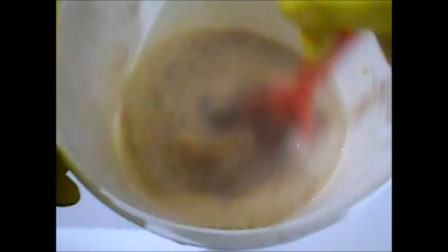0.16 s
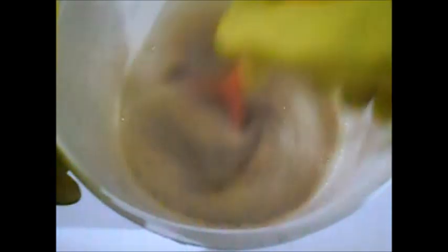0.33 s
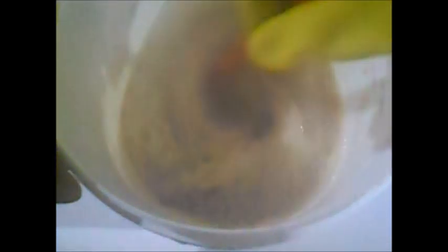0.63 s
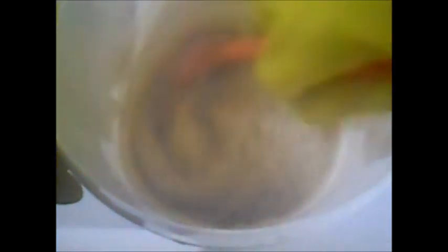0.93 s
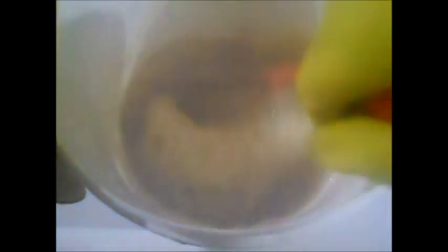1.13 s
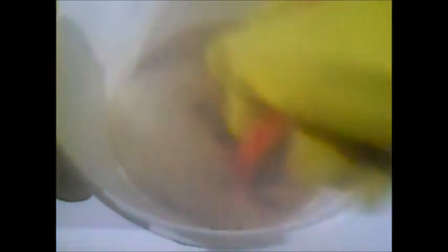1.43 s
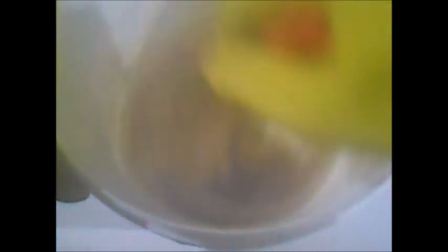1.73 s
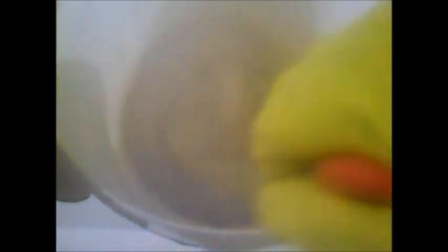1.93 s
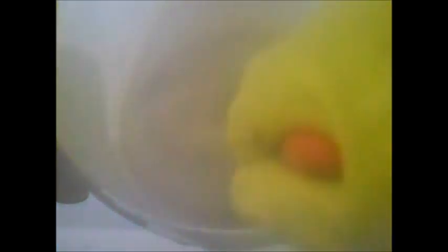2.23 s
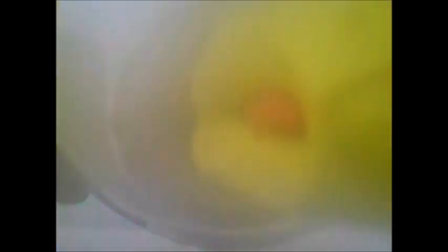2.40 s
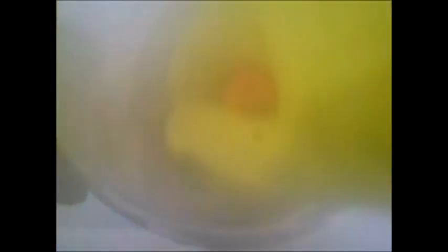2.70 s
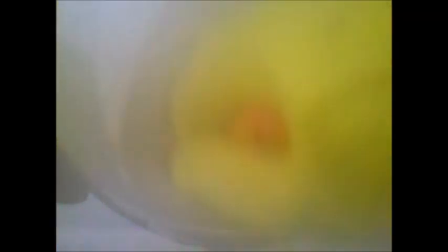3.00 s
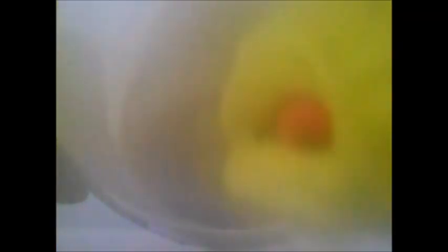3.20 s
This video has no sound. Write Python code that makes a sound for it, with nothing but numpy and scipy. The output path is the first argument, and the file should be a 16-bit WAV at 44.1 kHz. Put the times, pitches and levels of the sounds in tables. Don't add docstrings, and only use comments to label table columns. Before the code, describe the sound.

Wet gritty stirring in a plastic tub, separate strokes at first, then nearly continuous stronger scraping with squeaks and soft sloshes; the tip knocks the wall now and then. Close mono pickup indoors, low rumble and hiss.

```python
import sys
import numpy as np
from scipy import signal
from scipy.fft import rfft, irfft
from scipy.io import wavfile
from scipy.ndimage import uniform_filter1d

SR = 44100
rng = np.random.default_rng(int(sys.argv[2]) if len(sys.argv) > 2 else 0)


def gain_from_decibels(decibels):
    exponent = np.asarray(decibels, float) / 20
    return 10 ** exponent


def bounce(signal):
    frames = np.transpose(np.atleast_2d(signal))
    limited = np.clip(frames, -1, 1)
    pcm = np.round(limited * 32767).astype(np.int16)
    wavfile.write(sys.argv[1], SR, pcm)


N = 147735


def evened(x):
    return x / np.sqrt(np.mean(x ** 2) + 1e-20)


def coloured(x, points):
    f, db = np.transpose(points)
    bins_hz = np.fft.rfftfreq(8192, 1 / SR)
    curve_db = np.interp(np.log(bins_hz + 1), np.log(f), db, -60, -60)
    log_gain = curve_db * np.log(10) / 20
    whole = np.r_[log_gain, log_gain[-2:0:-1]]
    taps = np.fft.ifft(np.exp(np.conj(signal.hilbert(whole)))).real
    return evened(signal.oaconvolve(x, taps[:8000])[:N])


def slow(per_s):
    size = max(int(SR / per_s), 2)
    z = uniform_filter1d(rng.standard_normal(N), size)
    return evened(uniform_filter1d(z, size))


def resonate(x, hz, width):
    turn = np.exp(2j * np.pi * np.cumsum(hz * np.ones(len(x))) / SR)
    r = np.exp(-np.pi * width / SR)
    return 2 * (turn * signal.lfilter([1 - r], [1, -r], x / turn)).real


def patchy(x, db):
    z = signal.stft(x, nperseg=512)[2]
    field = uniform_filter1d(rng.standard_normal(z.shape), size=6, axis=0)
    field = uniform_filter1d(field, size=7, axis=1)
    return signal.istft(z * gain_from_decibels(db * evened(field)), nperseg=512)[1][:N]


def add(mix, s, sound):
    part = mix[round(s * SR):][:len(sound)]
    part += sound[:len(part)]


def room_hiss():
    # frequency in Hz, level in dB per Hz.
    spectrum = [(88, -8), (150, -5), (248, -9), (319, -9.5), (2140, -23), (2960, -25), (3420, -26.5),
                (6770, -29), (11000, -34), (14300, -71), (22000, -120)]
    return gain_from_decibels(-55) * patchy(coloured(rng.standard_normal(N), spectrum), 2.4)


def room_rumble():
    # frequency in Hz, level in dB per Hz.
    spectrum = [(5.9, -42.5), (10, 4), (32, -1.5), (64, -9), (86, -15), (250, -31), (320, -31), (550, -120)]
    level_db = -40.5 + 0.23 * np.tanh(slow(9.3))
    return gain_from_decibels(level_db) * coloured(rng.standard_normal(N), spectrum)


def slosh(length, db, top_hz):
    low_hz, rise = 402, 0.21
    u = np.arange(0, 1, 1 / (length * SR))
    band = signal.butter(3, (low_hz, top_hz), "band", fs=SR, output="sos")
    dull = signal.sosfilt(band, rng.standard_normal(len(u)))
    return gain_from_decibels(db) * evened(dull) * np.minimum(u / rise, 1) * (1 - u ** 2)


def add_sloshes(mix):
    # start in seconds, length in seconds, level in dB, top in Hz.
    sloshes = [(0.562, 0.083, -50, 2000), (1.155, 0.046, -56, 2580), (1.788, 0.048, -45.5, 1400),
               (2.035, .075, -50, 2700), (2.116, 0.043, -44.5, 1500), (3.065, 0.1, -42, 2000),
               (3.274, 0.09, -42.5, 960)]
    for s, *rest in sloshes:
        add(mix, s, slosh(*rest))


SQUEAK_STRETCH = 1.4


def squeak(length, db, hz):
    rough_width_hz, roughness = 97, 0.56
    u = np.arange(0, 1, 1 / (SQUEAK_STRETCH * length * SR))
    tone = np.sin(2 * np.pi * hz * np.arange(len(u)) / SR)
    rough = evened(resonate(rng.standard_normal(len(u)), hz, rough_width_hz))
    return gain_from_decibels(db - 3) * np.sin(np.pi * u) * (tone + roughness * rough)


def add_squeaks(mix):
    # middle in seconds, length in seconds,
    # level in dB, pitch in Hz.
    squeaks = [(0.447, 0.043, -46, 1695), (0.514, 0.021, -45, 3100), (0.551, 0.031, -43, 1711),
               (0.775, 0.0079, -58, 6060), (0.775, 0.036, -68, 2630), (1.43, 0.016, -45.5, 3450),
               (1.436, 0.024, -40, 1243), (1.444, 0.062, -54, 1320), (1.867, 0.017, -39, 1310),
               (2.227, 0.069, -52, 2070), (2.233, 0.025, -48, 1210), (2.236, 0.02, -44, 4960),
               (2.236, 0.026, -45, 3620), (2.241, 0.02, -46, 6890), (2.25, 0.05, -47, 4750),
               (2.273, 0.031, -39.5, 3772), (2.521, 0.026, -41, 1244), (2.548, 0.035, -42, 3330),
               (2.744, 0.054, -53, 4570), (2.805, 0.032, -43, 1319), (2.878, 0.059, -44, 1440),
               (2.88, 0.064, -38.5, 1320), (2.888, 0.02, -46, 4210), (2.889, 0.023, -41, 3620),
               (2.938, 0.03, -41.5, 1912), (3.042, 0.024, -51, 2520), (3.085, 0.026, -43, 1540),
               (3.178, 0.025, -49, 6600), (3.178, 0.022, -33.5, 1300), (3.179, 0.033, -55, 3630),
               (3.18, 0.017, -46, 1650), (3.185, 0.046, -45.5, 2285), (3.192, 0.024, -43, 9020),
               (3.208, 0.063, -38, 1420), (3.211, 0.035, -48, 6780), (3.211, 0.057, -49, 5000),
               (3.233, 0.018, -44, 8300)]
    # middle in seconds, length in seconds, level in dB, pitch in Hz.
    more_squeaks = [(2.585, .01, -35, 2900), (1.846, 0.0089, -43.5, 3750), (1.858, 0.012, -40, 3800),
                    (.435, .03, -43, 1300), (.512, .015, -37, 930)]
    # middle in seconds, length in seconds, level in dB, pitches of its partials
    # in Hz.
    thin_tones = (.776, .018, -57, (1000, 1300, 1720, 2590, 3950, 4370, 4930, 5310, 6030))
    s, length, db, partials = thin_tones
    notes = squeaks + more_squeaks + [(s, length, db, hz) for hz in partials]
    for s, length, *rest in notes:
        add(mix, s - SQUEAK_STRETCH * length / 2, squeak(length, *rest))


def snap(db, low_hz):
    snap_s = 0.00045
    u = np.arange(300) / SR / snap_s
    burst = rng.standard_normal(300) * u * np.exp(1 - u)
    burst = signal.lfilter(*signal.butter(2, low_hz, "high", fs=SR), burst)
    return gain_from_decibels(db) * burst / abs(burst).max()


def add_snaps(mix):
    # start in seconds, peak in dB, frequency in Hz below which it is thin.
    snaps = [(0.0224, -28, 1470), (.072, -32, 5000), (.0785, -41, 7500), (.0929, -16.5, 5000),
             (0.2307, -31, 4000), (0.2348, -24, 5000), (.242, -32, 5000), (.4027, -45, 7000),
             (0.858, -34, 4500), (1.166, -39, 8500), (1.346, -33, 5500), (1.357, -37, 5500),
             (1.6667, -33.5, 4430), (1.795, -41, 5000), (2.035, -32, 7000), (2.672, -34.5, 4500),
             (1.217, -40.5, 2500), (2.995, -33, 7000), (2.996, -35, 7000), (3.327, -45, 8000)]
    for s, *rest in snaps:
        add(mix, s, snap(*rest))


def pop(db, hz):
    cycles, glide, crack_db, crack_s = 0.85, 0.04, -12, 0.0012
    t = np.arange(600) / SR
    u = t * hz / cycles
    tone = np.sin(2 * np.pi * hz * t * (1 + glide * u / 4)) * u * np.exp(1 - u)
    crack = rng.standard_normal(600) * np.exp(-t / crack_s)
    return gain_from_decibels(db) * (tone + gain_from_decibels(crack_db) * crack)


def add_pops(mix):
    # start in seconds, peak in dB, pitch in Hz.
    pops = [(.05, -46, 2600), (.058, -43, 2000), (0.338, -42.5, 920), (0.362, -38.5, 960),
            (0.39, -32, 1340), (0.419, -31, 1410), (0.728, -38, 1580), (0.818, -44.5, 1570),
            (0.859, -41.5, 2720), (0.875, -40.5, 1646), (.92, -40.5, 1210), (1.028, -42.5, 1660),
            (1.128, -39, 1300), (1.165, -41.5, 1760), (1.1676, -42, 3450), (1.218, -40.5, 1210),
            (1.345, -38, 1800), (1.43, -31.5, 3620), (1.614, -41, 1080), (1.677, -44, 3670),
            (1.688, -50, 3530), (1.731, -45.5, 3290), (1.989, -46, 2300), (2.118, -38, 1080),
            (2.131, -40, 5300), (2.412, -33.5, 1500), (2.542, -40, 1720), (2.851, -36, 1390),
            (2.0334, -28, 2460), (0.093, -35, 1500)]
    for s, *rest in pops:
        add(mix, s, pop(*rest))


def knock(db, tick_hz, boom_db, boom_hz):
    # frequency as a ratio to the tick, and their levels in dB.
    mate_ratios = (0.753, 1.26, 2.24)
    mate_levels = (-6, -8.5, -20.5)
    tick_s, tick_rise_s, boom_rise_s, boom_cycles = 0.0015, 0.00052, 0.00077, 25.3
    t = np.arange(5000) / SR
    tick = np.sin(2 * np.pi * tick_hz * t)
    for ratio, mate_db in zip(mate_ratios, mate_levels):
        tick = tick + gain_from_decibels(mate_db) * np.sin(2 * np.pi * tick_hz * ratio * t)
    tick = tick * np.minimum(t / tick_rise_s, 1) * np.exp(-(t / tick_s) ** 2)
    boom = np.sin(2 * np.pi * boom_hz * t) * (1 - np.exp(-t / boom_rise_s))
    boom *= gain_from_decibels(boom_db - 60 * t * boom_hz / boom_cycles)
    return gain_from_decibels(db) * (tick - boom)


def add_knocks(mix):
    # start in seconds, peak in dB, tick in Hz, boom in dB, boom in Hz.
    knocks = [(.685, -24, 1113, -10.5, 403), (1.3544, -34, 724, -17, 495), (1.3596, -21, 2370, -7.5, 430),
              (1.8003, -37, 3620, 2, 1175), (1.803, -33.5, 1150, 3.5, 710), (1.806, -38.5, 657, 10.5, 396),
              (2.003, -32.5, 1900, -7, 388), (2.034, -18, 1820, -11, 449), (2.2304, -26.5, 1750, -6, 412),
              (2.5958, -19.5, 1480, -1.5, 980), (3.042, -22, 1390, -5.5, 715), (3.192, -31, 900, 4, 643)]
    for s, *rest in knocks:
        add(mix, s, knock(*rest))


def add_thump(mix):
    # start in seconds, length in seconds, level in dB.
    thump = (1.801, .029, -26)
    s, length, db = thump
    u = np.arange(0, 1, 1 / (length * SR))
    add(mix, s, gain_from_decibels(db) * np.sin(2 * np.pi * u) * np.sin(np.pi * u))


def pressure():
    # start, rise, hold and fall in seconds, pressure in dB.
    strokes = [(0.068, 0.0095, 0.12, .1, -44.5), (0.38, 0.043, 0.12, 0.16, -40.5),
               (0.629, 0.029, 0.058, 0.13, -49), (1.353, 0.013, 0.16, 0.19, -44),
               (1.828, 0.013, 0.03, 0.029, -42), (2.028, 0.0024, 0.015, 0.046, -50.5),
               (2.059, 0.16, 0.06, 0.1, -39.5), (2.396, 0.013, 0.069, 0.045, -49.5),
               (2.431, 0.12, 0.055, 0.14, -41), (2.682, 0.04, 0.099, 0.034, -46.5),
               (2.804, 0.049, 0.069, 0.073, -38.5), (2.937, 0.1, 0.02, 0.068, -36),
               (3.094, 0.078, 0.071, 0.073, -36.5), (3.24, 0.022, 0.092, 0.055, -44.5)]
    swing_db = 20
    t, power = np.arange(N) / SR, np.zeros(N)
    for start, rise, hold, fall, db in strokes:
        up = np.minimum((t - start - rise) / rise, 0)
        down = np.minimum((start + rise + hold - t) / fall, 0)
        power += gain_from_decibels(np.maximum(db + swing_db * (up + down), -150)) ** 2
    return np.sqrt(power)


def slips():
    per_s, spread_db = 6000, 2.5
    size = gain_from_decibels(spread_db * np.minimum(rng.exponential(1, N), 3)) * rng.standard_normal(N)
    clicks = size * (rng.random(N) < per_s / SR)
    return evened(clicks + 0.37 * rng.standard_normal(N))


def rung(x, hz, width):
    return resonate(x, hz, width) * np.sqrt(SR / np.pi / width / 2)


def scrape():
    # time in seconds, dryness in dB for the bright fizz,
    # bite in dB into the tub's hollow, ring in dB of its wall.
    dryness = [(0, -10, -11, 13), (.1, 7.5, -1, 4), (.2, 4, 1.5, 1), (.43, -4, -6, 2.5), (.5, 5, -6, 0),
               (.65, -7, 6.5, 7), (1.4, 3.5, 3.5, 2.5), (1.54, -2, -1, 2), (1.85, 5.5, -9, -3),
               (2.06, 3, 17.5, -9), (2.25, 2, -13, -1), (2.42, 10.5, 7, 7.5), (2.48, 0.5, 17, 6.5),
               (2.57, 9.5, -12.5, 6.5), (2.8, 0, 4.5, 5), (2.9, 4.5, 4, -4.5), (3.08, -1, 9.5, 3.5),
               (3.21, 5.5, -7, -5.5)]
    # frequency in Hz, width in Hz, level in dB.
    tub = [(410, 45, -14), (465, 70, -13), (820, 100, -17), (1170, 70, -12), (1330, 90, -11),
           (1700, 100, -15), (2250, 150, -20), (2950, 150, -22), (4200, 200, -25)]
    # frequency in Hz, level in dB per Hz.
    rasp_spectrum = [(88, -29), (150, -3), (281, -14.5), (396, 8.5), (547, -1), (1270, -1.5), (5660, -17),
                     (9030, -18.5), (11000, -96), (14300, -4), (22000, -120)]
    fizz_spectrum = [(1500, -5), (3000, 6), (5000, -4.5), (7000, -3), (9500, -0.5), (11000, -12)]
    hollow_below_hz, judder_db, mode_sway_db = 600, 1.5, 3
    streak_db, streak_sway_db, streak_width_hz = -25, 10.5, 15
    drift = 0.047

    push = pressure() * gain_from_decibels(judder_db * slow(88))
    drive = slips()
    times, *state = np.transpose(dryness)
    dry_db, bite_db, wall_db = (np.interp(np.arange(N) / SR, times, v) for v in state)

    ring = np.zeros(N)
    for hz, width, db in tub:
        state_db = bite_db if hz < hollow_below_hz else wall_db
        level = gain_from_decibels(db + mode_sway_db * slow(33) + state_db)
        ring += level * rung(drive * push, hz * (1 + drift * slow(6.4)), width)

    for hz in np.geomspace(900, 9500, num=24) * rng.uniform(.97, 1.03, size=24):
        level = gain_from_decibels(streak_db + streak_sway_db * np.clip(slow(37.4), -3, .8))
        level *= (1500 / hz) ** 0.69
        ring += level * rung(drive * push, hz * (1 + drift * slow(3.3)), streak_width_hz)

    rasp = gain_from_decibels(-4.5) * coloured(drive, rasp_spectrum)
    fizz = gain_from_decibels(-12 + dry_db) * coloured(slips(), fizz_spectrum)
    return ring + patchy(push * (rasp + fizz), 4)


def scene():
    mix = room_hiss() + room_rumble()
    add_sloshes(mix)
    add_squeaks(mix)
    add_snaps(mix)
    add_pops(mix)
    add_knocks(mix)
    add_thump(mix)
    mix += scrape()
    return np.array([mix, mix])


def thin_out(x):
    # middle in seconds, sparse above in Hz, gap from and to in Hz, lift in dB.
    starved = [(.776, 900, 6300, 10200, 5), (.778, 11000, 2800, 3750, 0), (.838, 4000, 6500, 7600, 3),
               (1.138, 2400, 2500, 3000, 3), (1.544, 2500, 5600, 10400, 4), (1.65, 2200, 8000, 9600, 3),
               (2.763, 7000, 4750, 6950, 5), (2.764, 11000, 3700, 4300, 0), (3.08, 3600, 8300, 9000, 4)]
    length_s, kept_share, leak = 0.03, 0.18, 0.02
    out, size = x.copy(), round(length_s * SR)
    window = np.minimum(1.13 * np.sin(np.pi * np.arange(size) / size), 1)
    hz = np.fft.rfftfreq(size, 1 / SR)
    for s, sparse_hz, low_hz, high_hz, lift_db in starved:
        start = round(s * SR) - size // 2
        at = slice(start, start + size)
        z = rfft(out[at] * window)
        prominence = abs(z) / uniform_filter1d(abs(z), size=40)
        strong = prominence > np.quantile(prominence, 1 - kept_share)
        gain = np.where(hz < sparse_hz, 1, gain_from_decibels(lift_db) * strong)
        outside_gap = (hz < low_hz) | (hz > high_hz)
        gain = np.maximum(gain * outside_gap, leak)
        out[at] += window * irfft(z * (gain - 1), size)
    return out


def top_cut(x):
    return signal.sosfilt(signal.butter(12, 11300, fs=SR, output="sos"), x)


def record(dry):
    taps = signal.firwin(101, 10750, window=("kaiser", 6), fs=SR)
    mono = signal.oaconvolve(thin_out(dry[0]), taps, "same")
    return top_cut(np.array([mono, mono]))


dry = scene()
out = record(dry)
bounce(out)
```